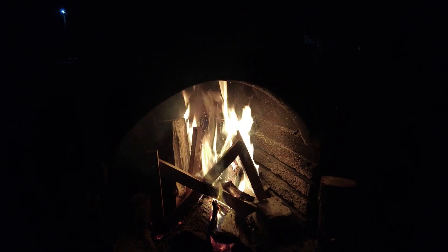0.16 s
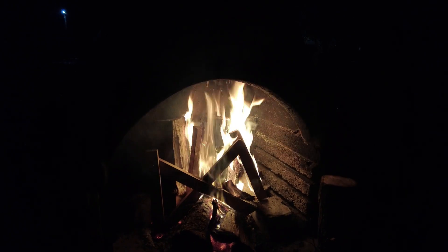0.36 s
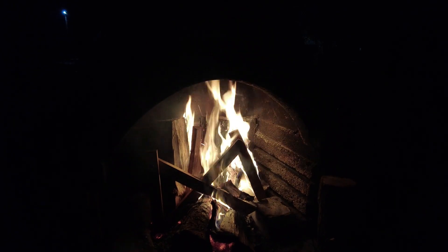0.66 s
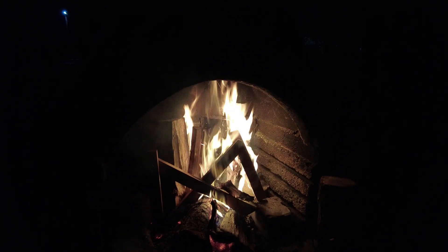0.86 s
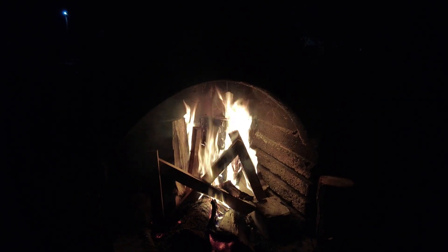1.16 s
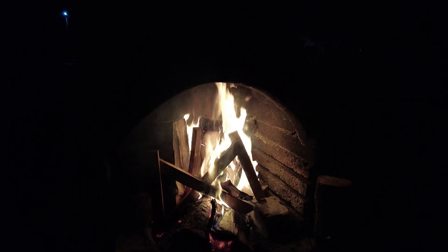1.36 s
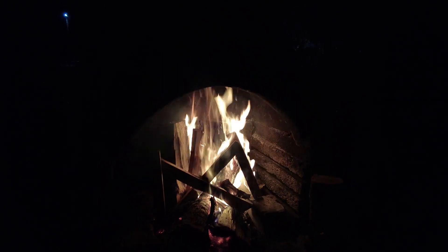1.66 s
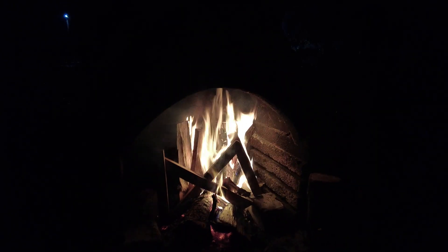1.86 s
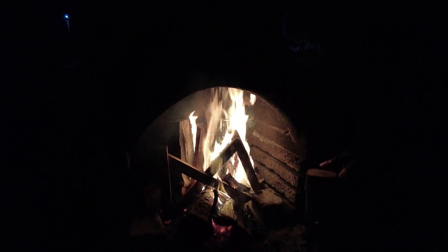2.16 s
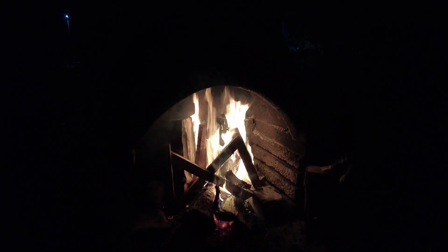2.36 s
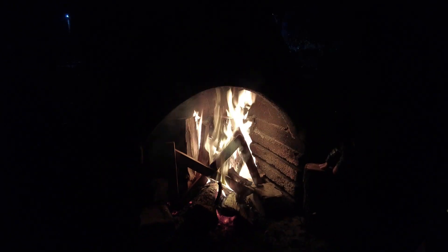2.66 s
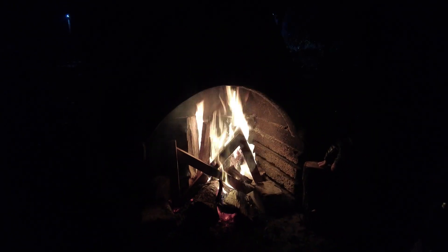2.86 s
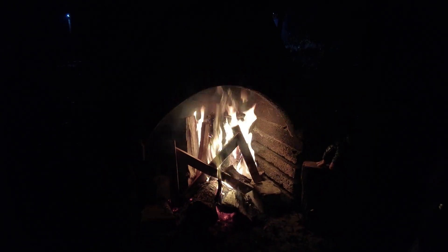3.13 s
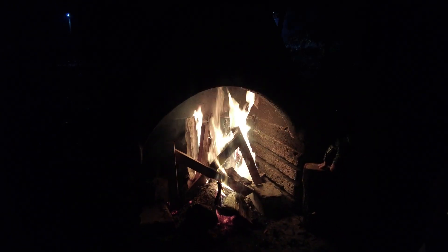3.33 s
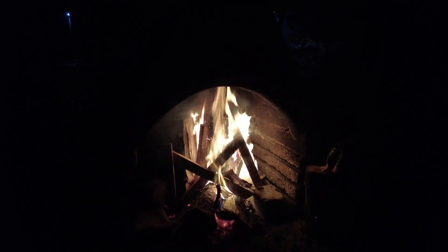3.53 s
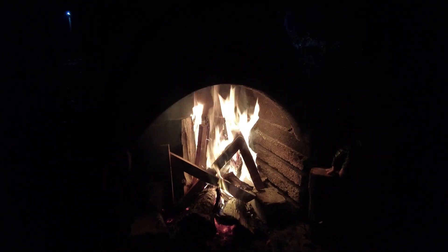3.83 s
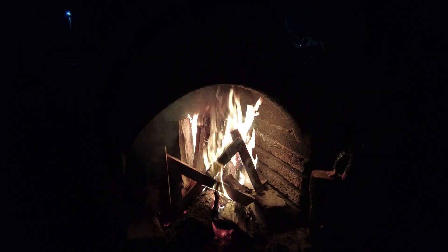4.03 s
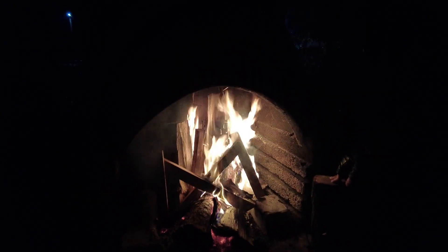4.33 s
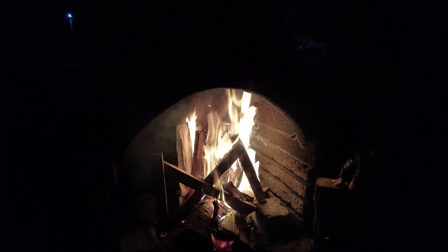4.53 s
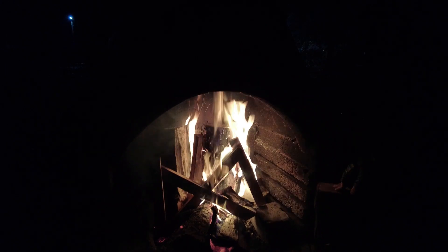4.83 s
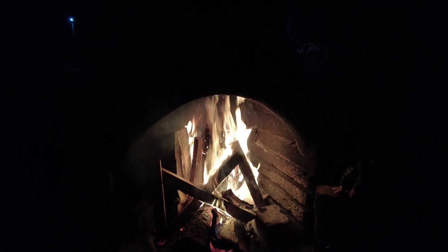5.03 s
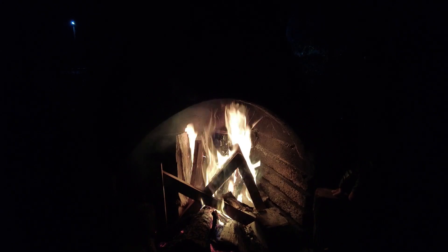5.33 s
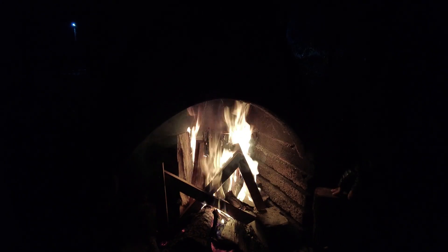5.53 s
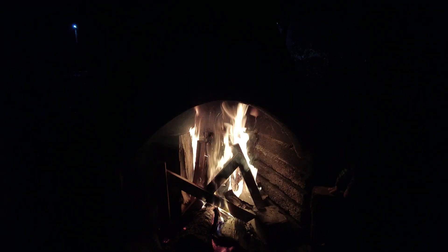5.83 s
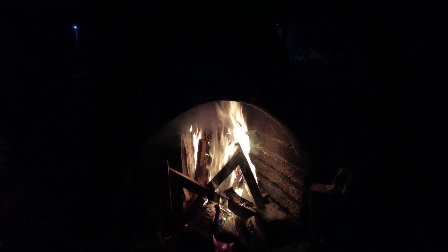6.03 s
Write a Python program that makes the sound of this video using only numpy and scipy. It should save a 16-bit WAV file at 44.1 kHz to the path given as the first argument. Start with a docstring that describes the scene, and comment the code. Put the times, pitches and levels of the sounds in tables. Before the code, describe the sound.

Split logs burn in an outdoor brick fireplace for about six seconds, heard in stereo from a couple of metres away. The flames make a soft, low, gently wavering rumble with a faint steady hiss, and tiny ticks of bark scatter throughout. Over this come sharp, dry, irregular pops near the centre, many faint and a few much louder, each with a slight woody knock and a very short hiss. Strong pops land at about 0.5 and 0.75 seconds, followed by moderate ones at 1.1, 1.6 and a pair around 2.7. A bright snap stands out at 3.5 seconds. Barely audible whistles of gas escape the wood between about 3.2 and 4.3 seconds. Another loud crack comes at 4.65 seconds, then a busier run of pops from 5.2 to 5.8, with lighter crackling and the rumble continuing to the end.

```python
"""Split logs pop as they burn in a brick vault, outdoors at night, a couple of metres from a stereo
microphone. Each pop is a pocket of steam bursting in the wood: the impulse excites resonances of
splinter, log and vault, reflects off the bricks and leaves a short hiss.
Small ticks of bark and faint whistles of gas scatter between the pops, over the low rumble of the
flames and a faint steady hiss."""
import sys
import numpy as np
from scipy import signal
from scipy.fft import rfft, irfft, next_fast_len
from scipy.io import wavfile
from scipy.ndimage import uniform_filter1d

SR = 44100
rng = np.random.default_rng(int(sys.argv[2]) if len(sys.argv) > 2 else 0)


def master_out(mix):
    """Clip the mix to full scale and print it as 16-bit PCM to the path in sys.argv[1]."""
    frames = np.transpose(np.atleast_2d(mix))
    ceiling = np.clip(frames, -1, 1)
    pcm = np.round(ceiling * 32767).astype(np.int16)
    wavfile.write(sys.argv[1], SR, pcm)


N = 272979
FFT_SIZE, POP_SIZE = next_fast_len(N), 7500  # samples

# steam bursts: (time [s], crack level [dB], crack pitch [Hz], knock [dB re crack], snap [dB re crack])
BURSTS = [(0.0731, -62, 3620, -15, 2), (0.1232, -54.5, 2690, -10, 3.5), (0.1491, -50.5, 4390, -13, 2.5),
          (0.235, -61.5, 4450, -20, 6), (0.2544, -57, 4470, -17, 4), (0.2983, -61.5, 2700, -20, 6),
          (0.5262, -26.5, 2560, -0.5, -10), (0.558, -36, 2780, -10, 8), (0.6321, -45, 2850, -13, 3.5),
          (0.7541, -20, 2590, -5, -7.5), (0.7821, -35.5, 3080, -10, 2), (0.7955, -45, 4370, -13, 4),
          (0.8238, -58.5, 2070, -7, 10.5), (0.9542, -62.5, 4390, -14, 8), (0.9724, -66, 4520, -11, 8),
          (1.024, -59, 1960, -1, -1), (1.0385, -49, 4300, -8, -3), (1.0567, -34, 4250, -9.5, -5),
          (1.1365, -64.5, 2800, -12, 6), (1.1785, -64, 5000, -14, 8), (1.1874, -56.5, 2720, -11, -0.5),
          (1.2334, -46, 2260, -10, -5.5), (1.3595, -56, 4770, -11, 2.5), (1.4295, -46, 2230, -17, 1.5),
          (1.5249, -64.5, 3400, 3, 10), (1.5551, -29, 4330, -6, -1.5), (1.7056, -59.5, 4350, -20, 6.5),
          (1.8329, -53, 2360, -2.5, -1.5), (1.8871, -60, 2580, -2, -22), (2.05, -54, 4340, -21, 6.5),
          (2.081, -66.5, 3450, -20, 12.5), (2.1152, -62.5, 4930, -14, 6), (2.222, -53.5, 3660, -15, -2),
          (2.262, -62.5, 5000, -8, 7), (2.3514, -48.5, 2400, 0.5, 5.5), (2.4742, -52.5, 2670, -8, 5.5),
          (2.618, -51, 2650, -27, 4), (2.6631, -30.5, 2720, -8, 7), (2.7476, -34.5, 1900, -3.5, -3),
          (2.9984, -67.5, 3510, -7, 13.5), (3.1228, -56.5, 2930, -12, 11.5), (3.3442, -45.5, 4160, -8.5, 5),
          (3.409, -68, 3010, -8, 9), (3.4558, -52.5, 3180, -15, 0), (3.4772, -24, 4320, -6.5, 6.5),
          (3.5101, -49.5, 2970, -17, 5.5), (3.632, -55.5, 4300, -15, 1), (3.6921, -64, 4690, -4, 8.5),
          (4.0152, -66, 2930, -17, 9), (4.0582, -52, 3960, -8, 10), (4.0825, -58, 2900, 2.5, -15),
          (4.3003, -43.5, 3030, -11.5, 6), (4.325, -56.5, 2900, -3, -2), (4.4774, -69, 3000, 2, 13),
          (4.6071, -58, 1910, 3, -5), (4.6257, -56, 2000, 1, 1), (4.6513, -19.5, 2610, -6, -13.5),
          (4.7081, -40, 2360, -16, 5.5), (4.7646, -48, 2050, -6, 5), (4.8056, -55, 2300, -3, -6),
          (4.8781, -43, 2260, 1.5, -4.5), (4.9297, -60.5, 4820, -22, 3), (5.0092, -71.5, 4410, -10, 17),
          (5.1666, -27.5, 2090, -10.5, 5.5), (5.2236, -34, 3090, -11, 8.5), (5.2793, -56, 4400, -1, 3.5),
          (5.3801, -66.5, 3100, -11, 9), (5.454, -25.5, 2590, -6, -5.5), (5.5261, -36.5, 4870, -3.5, 2),
          (5.618, -38.5, 4170, -10.5, 3.5), (5.7562, -36.5, 2180, 0, 7.5), (5.9856, -66, 3040, -12, 9),
          (6.0095, -47.5, 2170, 6, 9), (6.1167, -70, 4800, -9, 14.5), (6.1693, -57, 1920, -14, 1)]
# early reflections from the bricks: (mean delay [s], left gain [dB], right gain [dB])
REFLECTIONS = [(.00055, -3, -4), (.0012, -10, -7), (.0019, -13, -13), (.0028, -12, -9), (.0037, -16, -17)]
# bright resonances of a pop: (frequency [Hz], nominal width [Hz], gain before tilt [dB])
SNAP_MODES = [(6430, 1600, -4), (8740, 4800, -3.5), (10730, 5040, -3.5), (13900, 3400, -7.5)]
# resonances of the log: (frequency [Hz], nominal width [Hz], relative gain [dB])
LOG_MODES = [(690, 440, -11), (1075, 388, 1.5), (1597, 890, -2)]
# cavity resonances of the vault: (frequency [Hz], nominal width [Hz], level [dB re knock])
CAVITY_MODES = [(370, 360, -8), (149, 76, -9)]
# gas jets: (start [s], duration [s], frequency [Hz], nominal width [Hz], level at crest [dB])
GAS_JETS = [(1.93, 0.1, 2580, 900, -63.5), (3.2, 0.63, 2980, 150, -70.5), (3.79, .12, 846, 60, -70),
            (3.873, 0.065, 685, 40, -66), (3.99, 0.13, 1250, 50, -67), (4.22, .08, 1410, 50, -70)]
# course of the flames, used as swings about each mean: (time [s], rumble [dB], roar [dB])
FLAME_COURSE = [(0.0, -41, -55.5), (0.31, -46.5, -48), (0.55, -47.5, -51), (1.74, -45.5, -52.5),
                (1.91, -49.5, -47), (2.29, -49.5, -57), (2.71, -49.5, -49), (3.12, -49, -54.5),
                (3.52, -49, -52.5), (3.88, -47, -56), (4.03, -49, -51.5), (4.86, -51, -52),
                (5.21, -43.5, -48.5), (5.48, -47.5, -50), (5.86, -46.5, -53), (6.19, -52.5, -55.5)]
# steady noise of flames and night air: (frequency [Hz], relative spectral density [dB])
FLAME_SPECTRUM = [(12, -82.5), (20, 2.5), (49, 0.5), (139, -3.5), (189, -7.5), (273, -23.5), (351, -16),
                  (551, -28.5), (888, -32), (1280, -32), (2240, -38.5), (5070, -42), (6170, -42.5),
                  (15200, -45.5), (16500, -57.5)]
# likeness of left and right in that noise: (frequency [Hz], correlation [ratio])
COHERENCE = [(60, .98), (200, 0.98), (380, 0.64), (700, 0.02), (1300, 0.029), (2400, 0.28), (8000, 0.57),
             (15000, 0.21)]
# how far a band follows the swings: (frequency [Hz], share of rumble [ratio], share of roar [ratio])
SWING_SHARES = [(35, 1.1, 0.01), (80, 0.42, .1), (160, .1, .9), (350, .2, .6), (1500, .2, .2),
                (5000, .05, .05)]
# random flicker of a band: (frequency [Hz], depth [dB])
FLICKER_DEPTH = [(60, 2.1), (700, 2.4), (4000, .7)]


def pops(splinter_hz=5940, range_octaves=0.45, fire_pan_db=0.5, stray_db=2.7):
    """Superposition of all bursts; splinter pitch and place in the fire are random."""
    out = np.zeros((2, N + POP_SIZE))
    for (s, db, crack_hz, knock_db, snap_db), (pitch, place) in zip(BURSTS, rng.random((len(BURSTS), 2))):
        snap_hz = splinter_hz * 2 ** (range_octaves * pitch ** 2)  # mostly low in the range
        pan_db = fire_pan_db + stray_db * (2 * place - 1)  # left minus right
        pop = burst(crack_hz, knock_db, snap_hz, snap_db) + hiss_tail(knock_db, snap_db)
        start = int(s * SR)
        out[:, start:start + POP_SIZE] += pop * undb(db + np.array([[pan_db], [-pan_db]]) / 2)
    return out[:, :N]


def burst(crack_hz, knock_db, snap_hz, snap_db):
    """Impulse excitation of damped modes: ringing crack, dull knock, bright snap and cavity boom."""
    click = vault_response()
    # the body of the log yields more slowly than its skin, so crack and knock get a rounded push
    push = signal.lfilter(*signal.butter(2, 5200, fs=SR), click)
    crack = steep_resonance(push, crack_hz, 770) + 0.73 * steep_resonance(push, 3000, 2600)
    knock = sum((-1) ** k * undb(db) * steep_resonance(push, hz, width)
                for k, (hz, width, db) in enumerate(LOG_MODES))
    tilt = min(snap_db, 2)  # dB per octave: a weak snap is also a dull one
    snap = sum((-1) ** k * undb(db + tilt * np.log2(hz / SNAP_MODES[0][0]))
               * steep_resonance(click, hz, width) for k, (hz, width, db) in enumerate(SNAP_MODES))
    snap += steep_resonance(click, snap_hz, .13 * snap_hz)  # the splinter's own ring
    boom = sum(at_onset_level(steep_resonance(click[[0, 0]], hz, width), knock_db + db)
               for hz, width, db in CAVITY_MODES)
    return at_onset_level(crack, 0) + at_onset_level(knock, knock_db) + at_onset_level(snap, snap_db) + boom


def vault_response(delay_scatter=0.22, rattle_db=-21, coherence=.55):
    """Impulse response: direct sound, early reflections off the bricks, diffuse rattle among the logs."""
    noise = rng.standard_normal((3, POP_SIZE))
    diffuse = np.sqrt(coherence) * noise[0] + np.sqrt(1 - coherence) * noise[1:]
    out = undb(rattle_db) * decay(t60_s=.035) * diffuse
    out[:, 0] = 1
    for delay_s, left_db, right_db in REFLECTIONS:
        stretch = 1 + delay_scatter * np.tanh(rng.standard_normal())  # each pop sits elsewhere
        out[:, int(delay_s * SR * stretch)] += undb([left_db, right_db])
    return out


def hiss_tail(knock_db, snap_db):
    """Filtered noise after a pop, in three decaying bands that take the colour of the burst."""
    noise = rng.standard_normal((3, POP_SIZE))
    hiss = noise[0] + noise[1:]
    low = at_onset_level(steep_resonance(hiss, 1200, 1700) * tail_envelope(0.23), 0.42 * knock_db + 7)
    middle = at_onset_level(steep_resonance(hiss, 2500, 3000) * tail_envelope(0.58), 0)
    high = at_onset_level(steep_resonance(hiss, 6200, 8100) * tail_envelope(0.5), snap_db + 1)
    gain_db = -27 + .3 * snap_db  # a brighter pop leaves a louder hiss
    return undb(gain_db) * (low + middle + high)


def tail_envelope(t60_s, hold_s=0.086, drop_s=.008, residue=.35):
    """Decay of a pop's tail: a faint hiss, like echoes from nearby walls, holds, then drops and fades."""
    plateau = 1 / (1 + np.exp((np.arange(POP_SIZE) / SR - hold_s) / drop_s))
    return decay(t60_s) * (residue + (1 - residue) * plateau)


def ticks(per_second=40, weakest_db=-54.0, spread_db=3.5, size=600):
    """Shot noise: tiny cracks in the bark at random times, each a short filtered rattle."""
    out = np.zeros((2, N))
    for when, colour, strength, side in rng.random((400, 4))[:int(per_second * N / SR)]:
        noise = rng.standard_normal((3, size))
        rattle = (noise[0] + .7 * noise[1:]) * decay(t60_s=.016)[:size]
        hz = 4000 * 3.4 ** colour
        tick = resonance(rattle, hz, 1.8 * hz)
        peak_db = weakest_db - spread_db * np.log(1 - strength)  # exponential distribution
        pan_db = 3 * (side - .6) * np.array([[1], [-1]])
        start = int(when * (N - size))
        out[:, start:start + size] += tick / np.abs(tick).max() * undb(peak_db + pan_db)
    return out


def whistles():
    """Narrow-band noise: jets of gas from the logs swell and fade in a half sine."""
    out, t = np.zeros((2, N)), np.arange(N) / SR
    for start_s, length_s, hz, width_hz, db in GAS_JETS:
        jet = steep_resonance(rng.standard_normal((2, N)), hz, width_hz)
        swell = np.sin(np.pi * np.clip((t - start_s) / length_s, 0, 1))
        out += jet / jet.std() * undb(db) * swell
    return out


def flames(reference_db=-48.5):
    """Amplitude-modulated combustion noise: half-octave bands follow rumble and roar, and flicker."""
    hz = np.fft.rfftfreq(FFT_SIZE, 1 / SR) + 1
    times, *levels = np.transpose(FLAME_COURSE)
    swings_db = np.array([np.interp(np.arange(N) / SR, times, level) for level in levels])
    swings_db -= swings_db.mean(axis=1, keepdims=True)
    coherence = np.clip(on_log_axis(COHERENCE, hz), 0, 1)
    mid, side = rfft(rng.standard_normal((2, FFT_SIZE))) * undb(on_log_axis(FLAME_SPECTRUM, hz))
    spectrum = np.sqrt(1 + coherence) * mid + np.sqrt(1 - coherence) * side * np.array([[1], [-1]])
    reference_rms = np.std(irfft(spectrum[0] * (hz > 55) * (hz < 110), FFT_SIZE))  # before modulation
    shares, out = np.array(SWING_SHARES), 0
    for octave in np.arange(4, 14.5, .5):
        window = np.cos(np.pi * np.clip(np.log2(hz) - octave, -.5, .5)) ** 2
        band = irfft(spectrum * window, FFT_SIZE)[:, :N]
        follow_db = sum(on_log_axis(shares[:, [0, k + 1]], 2 ** octave) * swing
                        for k, swing in enumerate(swings_db))
        flicker_db = on_log_axis(FLICKER_DEPTH, 2 ** octave) * flicker(rate_hz=5)
        out += undb(follow_db + flicker_db) * band
    return out * undb(reference_db) / reference_rms


def flicker(rate_hz):
    """Low-pass random modulation: held values, smoothed twice, with a spread near 1."""
    hold = int(SR / rate_hz)
    steps = np.repeat(rng.standard_normal(N // hold + 1), hold)
    return 1.54 * uniform_filter1d(uniform_filter1d(steps, hold), hold)[:N]


def microphone_ports(sound, lag_s=.000018, shade_db_per_hz=-1 / 12000):
    """Path difference and shadowing: the logs lie to one side, so the left is later and duller."""
    hz = np.fft.rfftfreq(FFT_SIZE, 1 / SR)
    transfer = undb(shade_db_per_hz * hz) * np.exp(-2j * np.pi * hz * lag_s)
    left = irfft(rfft(sound[0], FFT_SIZE) * transfer, FFT_SIZE)[:N]
    return np.array([left, sound[1]])


def resonance(x, hz, width_hz):
    """Second-order resonator with unit gain at its centre."""
    return signal.lfilter(*signal.iirpeak(hz, hz / width_hz, SR), x)


def steep_resonance(x, hz, width_hz):
    """Two widened resonators in cascade give steeper skirts."""
    return resonance(resonance(x, hz, 1.27 * width_hz), hz, 1.27 * width_hz)


def decay(t60_s):
    """Exponential damping, 60 dB in t60_s, over the length of one pop."""
    return 1000. ** (-np.arange(POP_SIZE) / SR / t60_s)


def at_onset_level(x, db):
    """Normalisation to an rms level over the first 8 ms."""
    return x * undb(db) / np.sqrt(np.mean(x[:, :int(.008 * SR)] ** 2))


def on_log_axis(table, hz):
    """Interpolation of (frequency, value) points on a logarithmic frequency axis."""
    frequencies, values = np.transpose(table)
    return np.interp(np.log(hz), np.log(frequencies), values)


def undb(db):
    """Amplitude ratio of a level in decibels."""
    return 10 ** (np.asarray(db) / 20)


def scene():
    """Superposition of pops, ticks, flames and whistles."""
    return microphone_ports(pops() + ticks()) + flames() + whistles()


def record(dry, cutoff_hz=16400):
    """Band limiting: a steep elliptic low-pass removes the highest treble."""
    return signal.sosfilt(signal.ellip(10, .5, 90, cutoff_hz, fs=SR, output="sos"), dry)


dry = scene()
out = record(dry)
master_out(out)
```